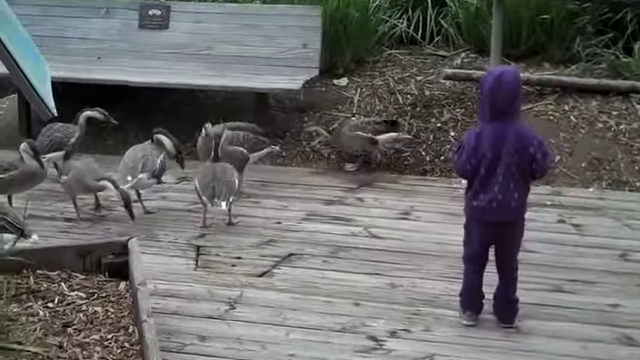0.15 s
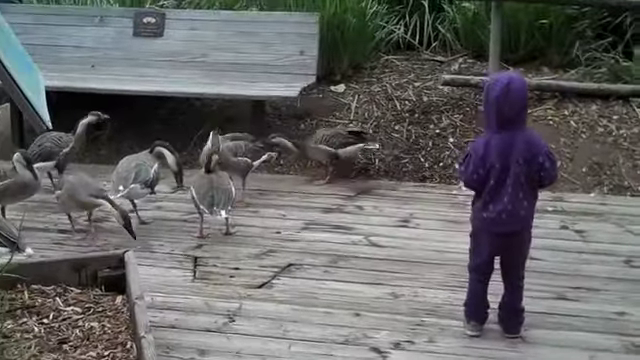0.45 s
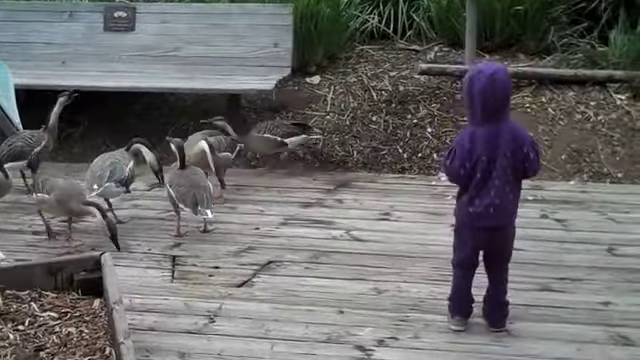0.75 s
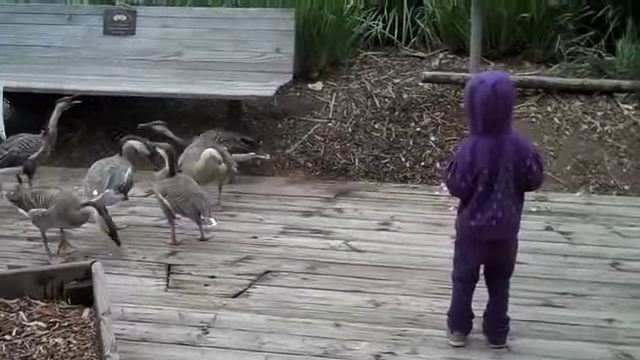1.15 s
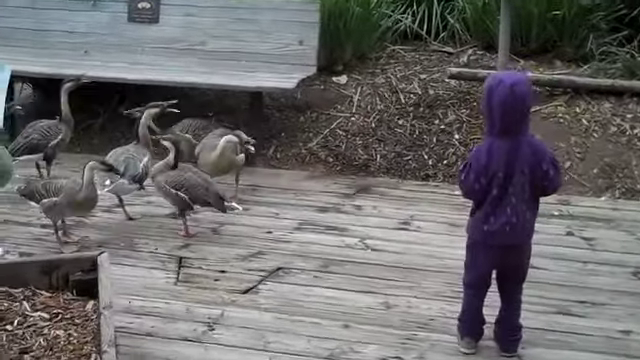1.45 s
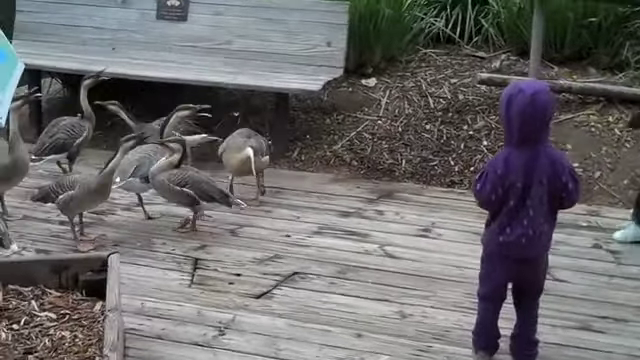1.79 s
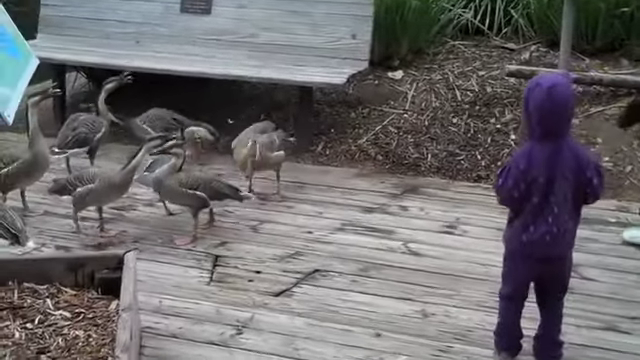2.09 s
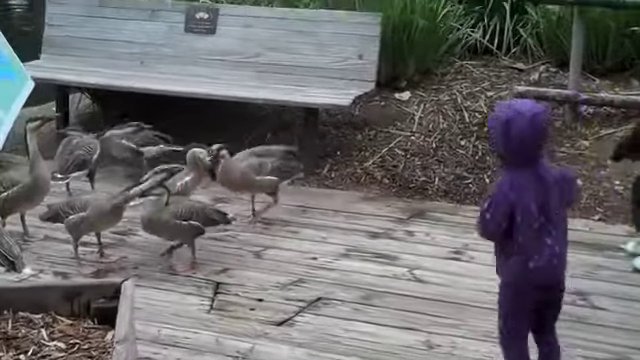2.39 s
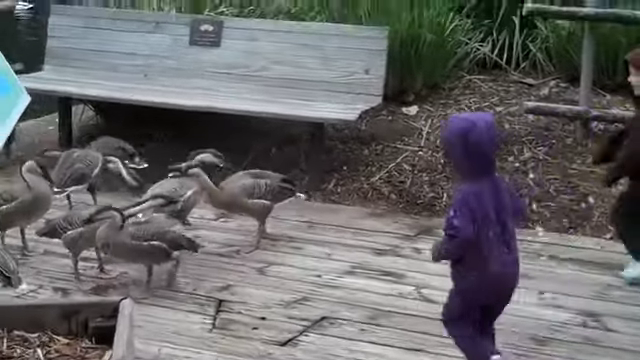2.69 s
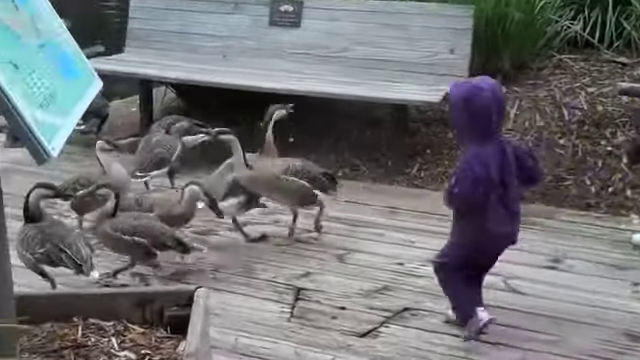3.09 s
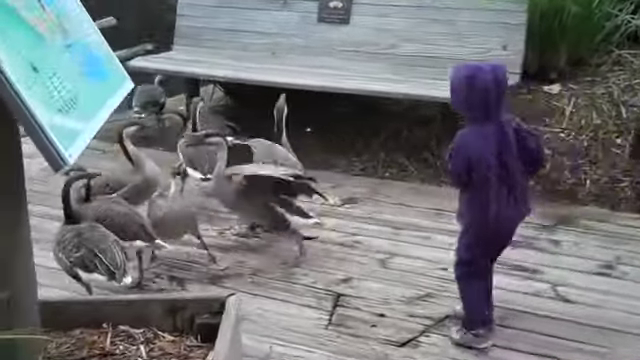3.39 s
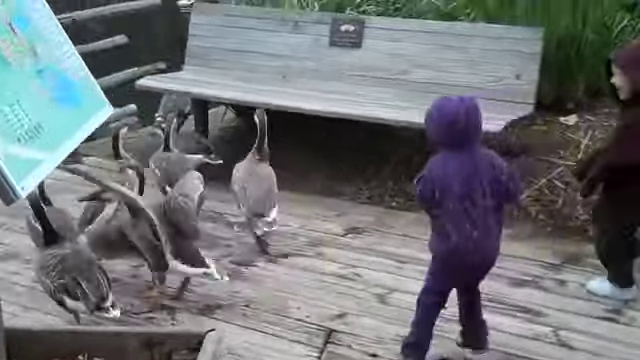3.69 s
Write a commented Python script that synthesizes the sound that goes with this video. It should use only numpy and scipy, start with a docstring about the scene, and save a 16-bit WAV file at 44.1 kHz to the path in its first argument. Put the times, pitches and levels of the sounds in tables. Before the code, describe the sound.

A flock of geese cackles and honks without a break on an outdoor wooden deck. Nearby rasping calls and short high honks overlap a gabble farther back, and a few soft steps thump on the boards, mostly near the end.

```python
"""On a wooden deck outdoors, a flock of geese cackle and honk over one another.
A rasping cackle is a run of uneven snaps and puffs of air that make a long throat ring.
A honk is a short, high note, sometimes clean and sometimes growling. More geese gabble
and hoot behind them, and a few steps thump on the boards. The yard adds a short echo
and a steady hush."""
import sys
import numpy as np
from scipy import signal
from scipy.fft import rfft, irfft
from scipy.io import wavfile
from scipy.ndimage import map_coordinates

SR = 44100
rng = np.random.default_rng(int(sys.argv[2]) if len(sys.argv) > 2 else 0)


def unload_audio(sound):
    """Save the sound as a 16-bit wav file, at the path given as the first command line argument."""
    columns = np.transpose(np.atleast_2d(sound))
    # keep every value between -1 and 1, then stretch to whole-number steps
    steps = np.round(np.clip(columns, -1, 1) * 32767)
    wavfile.write(sys.argv[1], SR, steps.astype(np.int16))


N = 169785

# How loud the far flock is as time passes. Each row: time in seconds, level in dB.
FLOCK_LEVELS = [(0, -36), (.86, -38.5), (0.919, -49), (1.049, -34.5), (1.28, -41.5), (1.65, -33.5),
                (2.11, -39.5), (2.96, -40), (3.199, -34), (3.74, -47.5)]
CACKLE_LEAD_S = .006  # a cackle begins this long before its listed start


def near_geese():
    """The geese on the deck cackle and honk, often at the same time."""
    # Each row: start in seconds, length in seconds, relative level in dB, the throat's low and main
    # ringing tones in Hz, then how far the low band and the treble are turned up or down in dB.
    cackles = [(0.053, 0.048, -37.5, 820, 2400, -31, 0), (0.149, 0.061, -31.5, 710, 2330, -6, -3.5),
               (0.231, 0.051, -35, 745, 2320, -29, -22), (0.292, 0.052, -38.5, 735, 2170, -3.5, -7),
               (0.399, 0.066, -30.5, 1150, 2040, -5.5, -2.5), (0.459, 0.043, -37, 1055, 1920, -1, -3.5),
               (0.526, 0.076, -37.5, 1150, 1956, 3, 3), (0.624, 0.068, -37, 780, 2110, -2.5, -3.5),
               (0.68, 0.14, -40.5, 980, 2110, 2, 6), (0.809, 0.067, -37.5, 1260, 2110, 7.5, 3.5),
               (0.951, 0.066, -41.5, 990, 2070, 4, 3.5), (1.025, 0.053, -38.5, 910, 2250, 5, 3.5),
               (1.095, 0.047, -36.5, 960, 2050, 3.5, 2), (1.159, 0.043, -35, 740, 2280, -0.5, -2),
               (1.223, 0.043, -36, 1210, 2230, -6, -8.5), (1.285, 0.064, -37.5, 750, 1710, -10.5, -2.5),
               (1.362, 0.04, -37, 740, 2261, -3, -0.5), (1.413, 0.054, -33, 900, 2630, 1.5, 2),
               (1.461, 0.059, -41, 1300, 2300, 4, 2.5), (1.522, 0.049, -34.5, 720, 2040, 4, 1.5),
               (1.608, 0.07, -35.5, 867, 1980, 3.5, -3), (1.671, 0.088, -33, 1020, 2040, -8, -3.5),
               (1.758, 0.089, -31.5, 996, 1983, -4, -0.5), (1.861, 0.073, -35, 1055, 2121, 2, -1),
               (1.916, 0.056, -29, 1300, 2070, -7.5, -4.5), (1.98, 0.1, -31.5, 1280, 2070, -7, -4.5),
               (2.12, 0.083, -35.5, 1080, 1630, -6, -4.5), (2.244, 0.074, -32.5, 1250, 2260, -1.5, 1.5),
               (2.355, 0.1, -38.5, 1080, 2130, -5.5, 1.5), (2.478, 0.078, -32, 1300, 2160, -5, 1.5),
               (2.615, 0.067, -34.5, 710, 2220, -5, -1), (2.694, 0.045, -32, 1070, 2210, -3.5, 1.5),
               (2.746, 0.055, -34, 1020, 2130, -0.5, 4), (2.812, 0.049, -36.5, 1360, 2030, 4, -2),
               (2.857, 0.071, -40.5, 1230, 1880, 6.5, -1), (2.978, 0.072, -42.5, 925, 2250, 0.5, 7.5),
               (3.08, 0.065, -32, 1090, 1980, -3.5, -0.5), (3.145, 0.097, -36, 875, 2250, -15, 1.5),
               (3.218, 0.1, -38.5, 870, 2360, 0.5, 4), (3.326, 0.071, -35.5, 727, 1760, -6.5, -28),
               (3.424, 0.054, -37, 766, 1970, -5.5, 0), (3.497, 0.1, -38, 1000, 1900, -6.5, 4),
               (3.584, 0.11, -39, 1249, 2010, 3.5, -6), (3.781, 0.067, -41, 1170, 2170, 2.5, -4.5)]
    # Each row: start in seconds, length in seconds, pitch in Hz, levels in dB of the first, second
    # and upper harmonics (before the mouth shapes them), mouth tone in Hz, roughness from 0 to 1.
    honks = [(0.122, 0.038, 1198, -31, -43, -40, 3680, 0.3),
             (0.551, 0.017, 1160, -31, -31, -37.5, 4260, 0.65),
             (0.645, 0.022, 738, -34.5, -41, -42, 3700, 0.3),
             (1.353, 0.079, 739, -36, -45, -44, 3900, 0.23),
             (1.403, 0.035, 899, -37, -43, -51.5, 4200, 0.26),
             (1.603, 0.069, 850, -39.5, -46, -59, 4000, 0.05),
             (1.785, 0.036, 1019, -40, -22.5, -30, 4070, 0.78),
             (1.867, 0.13, 1022, -59, -34.5, -42, 4030, 0.76),
             (2.022, 0.035, 1051, -58, -19, -30.5, 4150, 0.9),
             (2.162, 0.045, 1013, -40.5, -49, -33, 3820, 0.33),
             (2.264, 0.037, 1156, -47, -30, -37, 3400, 0.83),
             (2.377, 0.064, 1014, -38.5, -36, -40, 3800, 0.36),
             (2.497, 0.022, 1077, -30, -28, -31, 3200, 0.17),
             (3.164, 0.043, 889, -33, -55, -55, 3500, 0.13), (3.224, 0.082, 982, -53, -34, -34, 3000, 0.86),
             (3.512, 0.078, 1113, -53, -29.5, -32.5, 4570, 0.22),
             (3.641, 0.033, 1055, -51, -31, -48, 3500, 0), (3.7, 0.119, 919, -43.5, -54, -63, 2900, 0.45)]
    out = np.zeros(N)
    for start, length, db, *voice in cackles:
        add(out, start - CACKLE_LEAD_S, amp(db + 3.5) * cackle(length, *voice))
    for start, *note in honks:
        add(out, start, honk(*note))
    return out


def cackle(length, low_hz, main_hz, low_db, treble_db):
    """Uneven snaps of the voice membranes, each with a puff of air, make the throat ring."""
    length = length + CACKLE_LEAD_S + .01
    t = np.arange(0, length, 1 / SR)
    snap_hz = 178.88 * (1 + .3 * (rng.random() - .5))
    bend = 1 + .2 * arch(t, length) + .05 * wander(150, len(t))
    cycles = np.cumsum(snap_hz * bend) / SR
    snaps = np.diff(np.floor(cycles), prepend=0)  # one click per cycle
    puffs = np.exp(-(cycles % 1) / .8) * noise(len(t))
    effort = envelope(t, length, rise=.025, fall=.031)
    flicker = amp(2 * wander(320, len(t)))
    voice = (unit(snaps) + .9 * unit(puffs)) * flicker * effort
    ring = throat(low_hz, main_hz, low_db, treble_db)
    call = deck_bounces(neck_glide(signal.fftconvolve(voice, ring)))
    # The effort and the throat alone set how loud the call is.
    return call / np.linalg.norm(call) * np.linalg.norm(effort) * np.linalg.norm(ring)


def throat(low_hz, main_hz, low_db, treble_db, size=2048):
    """How the long windpipe and the mouth ring after a single snap."""
    # The throat's overall tone. Each row: frequency in Hz, relative level in dB.
    throat_tone = [(200, -36.5), (480, -14), (680, -4.5), (1500, -1.5), (2900, -2), (4300, 0.5), (5500, -7),
                   (7000, -15), (8500, -34)]
    f = abs(np.fft.fftfreq(size, 1 / SR))
    # Sound echoes along the windpipe, whose second ringing tone lies at main_hz.
    windpipe = 1 / abs(1 - .42 * np.exp(2j * np.pi * 2 * f / main_hz))
    mouth_db = 9.5 * peak(f, low_hz, width_hz=100) + 3.5 * peak(f, main_hz, width_hz=120)
    low = 1 / (1 + (f / 1450) ** 12)
    treble = 1 - 1 / (1 + (f / 3000) ** 12)
    shape = windpipe ** (1 - low / 2) * amp(read(throat_tone, f) + mouth_db)
    log_gain = np.log(shape)
    for band, db in [(low, low_db - 4), (1 - low - treble, 0), (treble, treble_db - 5)]:
        band_level = np.sqrt(np.mean(shape ** 2 * band))
        log_gain += band * np.log(amp(db) / band_level)
    # Turn the tone shape into a ring that starts at once and dies away.
    return np.fft.ifft(np.exp(np.conj(signal.hilbert(log_gain)))).real


def honk(length, pitch_hz, first_db, second_db, upper_db, mouth_hz, rough):
    """The voice breaks into a high note that arches and climbs; a rough one growls and trembles."""
    t = np.arange(0, length, 1 / SR)
    bend = .02 * arch(t, length) + .4 * (t - length / 2)
    hz = pitch_hz * (1 + bend + rough * .04 * wander(710, len(t)))
    phase = 2 * np.pi * np.cumsum(hz) / SR
    # Harmonics are tones at whole multiples of the pitch; the mouth shapes the upper ones.
    gains = [amp(first_db), amp(second_db)]
    gains += [amp(upper_db) * peak(k * pitch_hz, mouth_hz, width_hz=1300) for k in range(3, 8)]
    growl_hz = 222.5 * (1 + .297 * wander(130, len(t)))
    growl = 2 * np.pi * np.cumsum(growl_hz) / SR
    note = 0
    for k, gain in enumerate(gains, 1):
        lag, offset = rng.random(2)
        chop = 1 + rough * .81 * np.cos(growl + np.pi * lag)
        tremble = .35 * k * rough * wander(450, len(t))
        note += gain * unit(chop * np.sin(k * phase + 2 * np.pi * offset + tremble))
    return note * envelope(t, length, rise=.25 * length, fall=.4 * length)


def neck_glide(call):
    """The neck stretches or draws in during a call, so all its tones slide up or down."""
    t = np.arange(len(call)) / SR
    slide_per_s = 2 * rng.uniform(-1.015, 1)
    middle = np.sum(t * call ** 2) / np.sum(call ** 2)
    bent_time = t + slide_per_s / 2 * (t - middle) ** 2
    return map_coordinates(call, [bent_time * SR], order=3)


def deck_bounces(call, count=5, within_s=.006):
    """Each goose stands somewhere else, so each cackle bounces off deck and bench in its own way."""
    echoes = np.zeros(SR // 20)
    for when, sign in rng.random((count, 2)):
        echoes[int(when * within_s * SR)] += np.sign(sign - .5) * amp(3) / np.sqrt(count)
    echoes[0] = 1  # the sound that arrives directly
    return signal.fftconvolve(call, echoes / np.linalg.norm(echoes))


def far_geese(calls_per_s=40):
    """The rest of the flock cackles at random, blurring into a gabble."""
    out = np.zeros(N)
    for k in range(int(calls_per_s * N / SR) + 2):
        when, low, main = rng.random(3)
        call = cackle(.07, low_hz=640 + 300 * low, main_hz=1550 + 800 * main, low_db=-2.5, treble_db=1)
        add(out, (k + when - 2) / calls_per_s, call)
    return unit(out) * flock_loudness()


def far_hoots(hoots_per_s=11):
    """Among the far cackles, scattered low honks slide up or down."""
    out = np.zeros(N)
    for k in range(int(hoots_per_s * N / SR)):
        when, pitch, strength = rng.random(3)
        hz = 666 * (1 + .35 * pitch)
        note = honk(.06, hz, first_db=0, second_db=-9, upper_db=-14, mouth_hz=3000, rough=.5)
        add(out, (k + 2 * when - 1) / hoots_per_s, (.5 + strength) * neck_glide(note))
    return out * amp(-8) * flock_loudness()


def flock_loudness():
    """The far flock swells and fades."""
    return amp(np.interp(np.arange(N) / SR, *np.transpose(FLOCK_LEVELS)))


def footsteps(plank_hz=134, swing_s=.011, rise_s=.0015, fade_s=.009):
    """Each step knocks on the deck; then the plank gives with a lower thud."""
    # Each row: start in seconds, level in dB, rough pitch of the knock in Hz.
    steps = [(0.576, -42, 260), (2.595, -41, 370), (3.034, -42, 260), (3.243, -38, 420),
             (3.396, -40.5, 240)]
    out, t = np.zeros(N), np.arange(SR // 2) / SR
    thud = np.sin(2 * np.pi * plank_hz * t) * t / swing_s * np.exp(1 - t / swing_s)
    strike = np.minimum(t / rise_s, 1) * np.exp(-t / fade_s)
    for start, db, hz in steps:
        band = signal.butter(2, [hz / 2, hz * 1.08], "band", fs=SR, output="sos")
        knock = unit(signal.sosfilt(band, noise(len(t)))) * strike
        add(out, start, amp(db) * knock)
        add(out, start + .01, amp(db - 14.5) * thud)
    return out


def yard_echo(sound, fade_s=.23):
    """The yard sends back a thin scatter of echoes that soon dies away."""
    t = np.arange(SR // 2) / SR
    echoes = noise(len(t)) * (rng.random(len(t)) < .05)
    tail = echoes * amp(-60 * t / fade_s) * np.minimum(t / .014, 1)
    return sound + amp(-15) * signal.fftconvolve(sound, tail / np.linalg.norm(tail))[:N]


def outdoor_hush():
    """A steady hush with a low, distant drone."""
    # The tone of the hush. Each row: frequency in Hz, relative level in dB.
    hush_tone = [(70, -15), (190, 3.5), (270, -0.5), (450, -5.5), (900, 5), (2500, 3), (6000, -46)]
    gains = amp(read(hush_tone, np.fft.rfftfreq(N, 1 / SR)))
    return amp(-48) * unit(irfft(rfft(rng.standard_normal(N)) * gains, N))


def amp(db):
    """Turns decibels into a number to multiply by."""
    return 10 ** (np.asarray(db) / 20)


def unit(x):
    """Scales a sound to an average strength (rms) of 1."""
    return x / np.sqrt(np.mean(x ** 2) + 1e-20)


def read(points, hz):
    """Reads between the rows of a tone table, with octaves evenly spaced."""
    f, db = np.transpose(points)
    return np.interp(np.log(hz + 1), np.log(f), db)


def add(mix, start_s, sound):
    """Mixes a sound in, cutting off whatever does not fit."""
    at = round(start_s * SR)
    sound = sound[max(-at, 0):]
    part = mix[max(at, 0):][:len(sound)]
    part += sound[:len(part)]


def noise(size):
    """White noise, up to half a second long."""
    return rng.standard_normal(SR // 2)[:size]


def wander(hz, size, count=8192):
    """A random wobble, mostly slower than hz."""
    f = np.fft.rfftfreq(count, 1 / SR)
    wobble = irfft(rfft(rng.standard_normal(count)) * np.exp(-(f / hz) ** 2))
    return np.resize(unit(wobble), size)


def arch(t, length):
    """One rise and fall that averages zero."""
    return np.sin(np.pi * t / length) - 2 / np.pi


def peak(hz, centre_hz, width_hz):
    """A hump of height 1 that drops to half at width_hz from its centre."""
    return 1 / (1 + ((hz - centre_hz) / width_hz) ** 2)


def envelope(t, length, rise, fall):
    """Fades smoothly in and out; all times are in seconds."""
    fade_in = np.sin(np.pi / 2 * np.clip(t / rise, 0, 1))
    fade_out = np.sin(np.pi / 2 * np.clip((length - t) / fall, 0, 1))
    return fade_in * fade_out


def scene():
    """Geese and steps echo in the yard over the hush, in one channel."""
    sources = near_geese() + far_geese() + far_hoots() + footsteps()
    return (yard_echo(sources) + outdoor_hush())[None]


def record(dry, limit=.55, sag_hz=5.6, top_hz=8800):
    """The loudest honks overload the microphone a little and leave a slow sag; the top treble is cut."""
    squashed = dry / (1 + (dry / limit) ** 6) ** (1 / 6)
    sag = signal.sosfilt(signal.butter(1, sag_hz, fs=SR, output="sos"), squashed ** 2)
    out = squashed - amp(-8.5) * sag / limit
    treble_cut = signal.firwin(301, top_hz, window=("kaiser", 8), fs=SR)
    return signal.oaconvolve(out, treble_cut[None], "same")


dry = scene()
out = record(dry)
unload_audio(out)
```